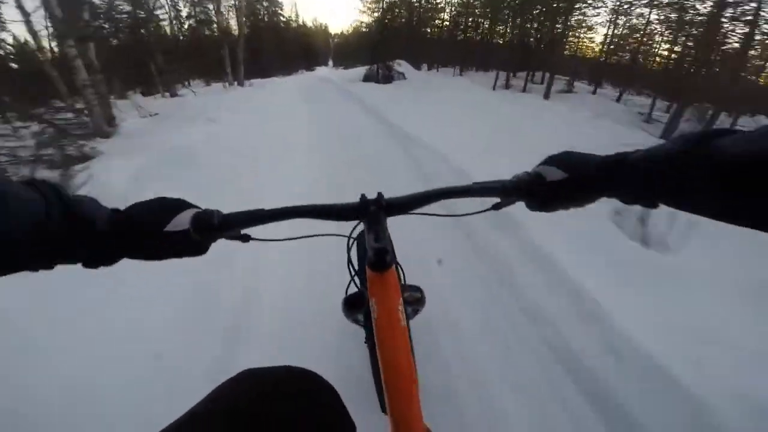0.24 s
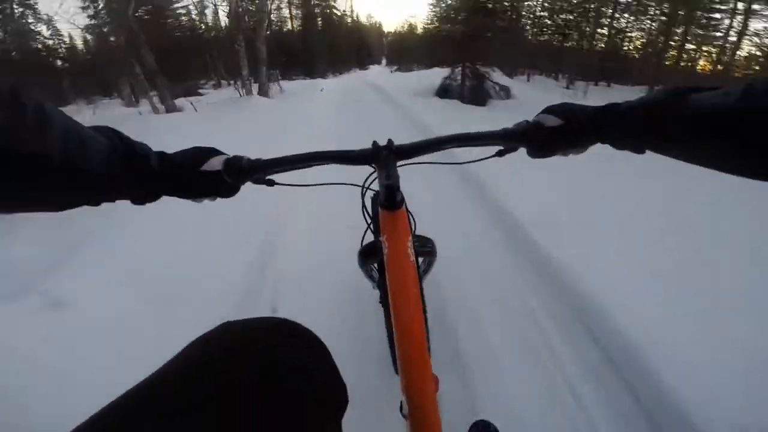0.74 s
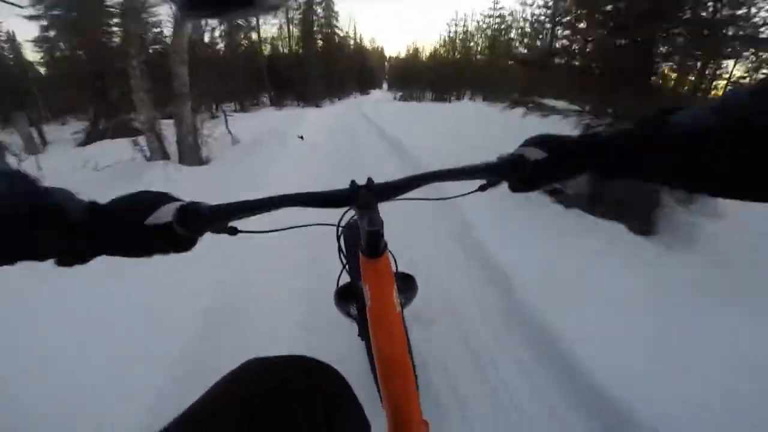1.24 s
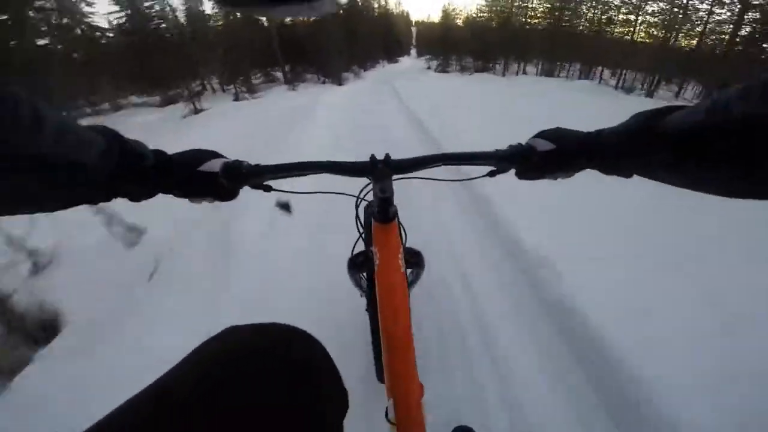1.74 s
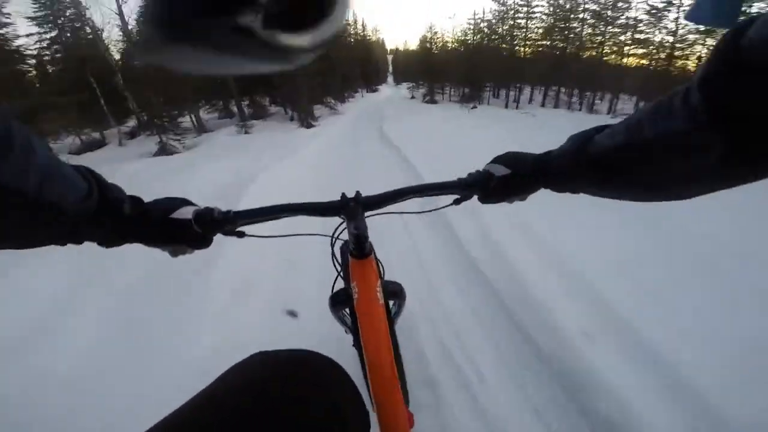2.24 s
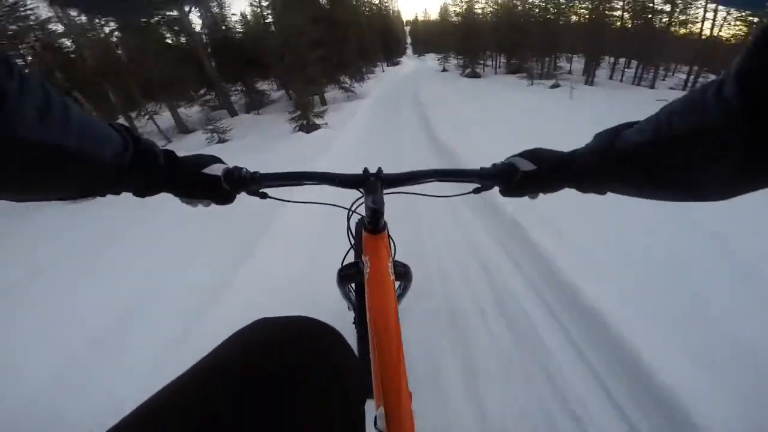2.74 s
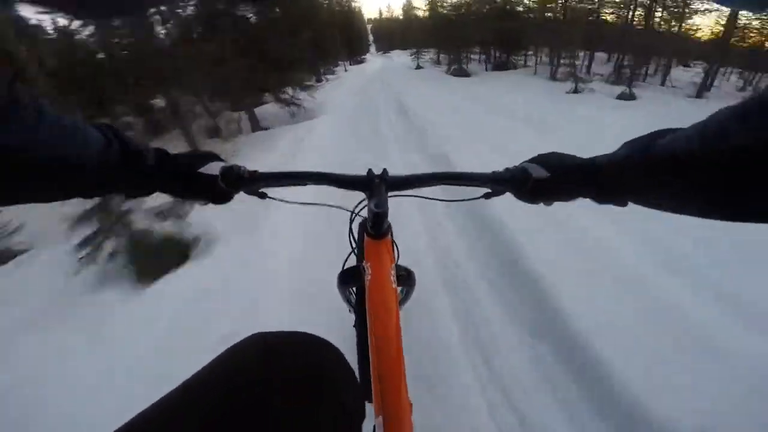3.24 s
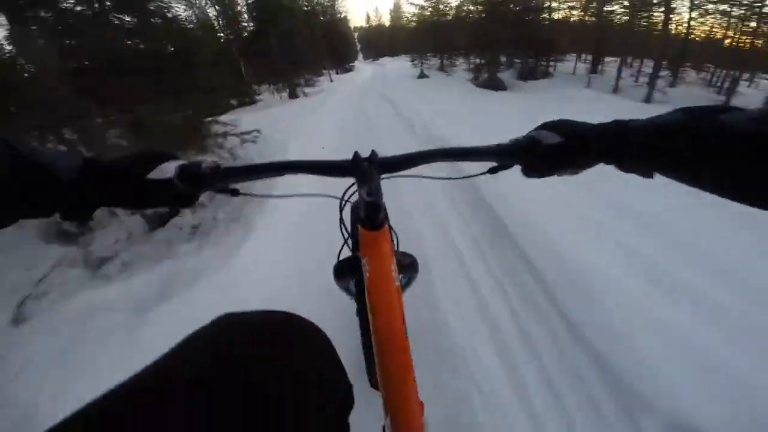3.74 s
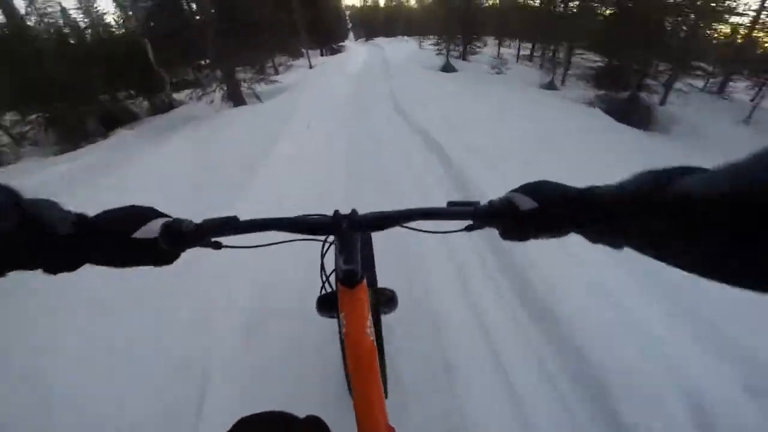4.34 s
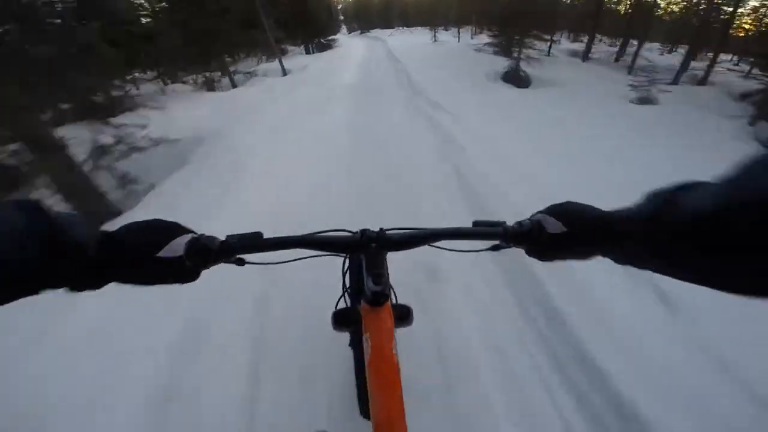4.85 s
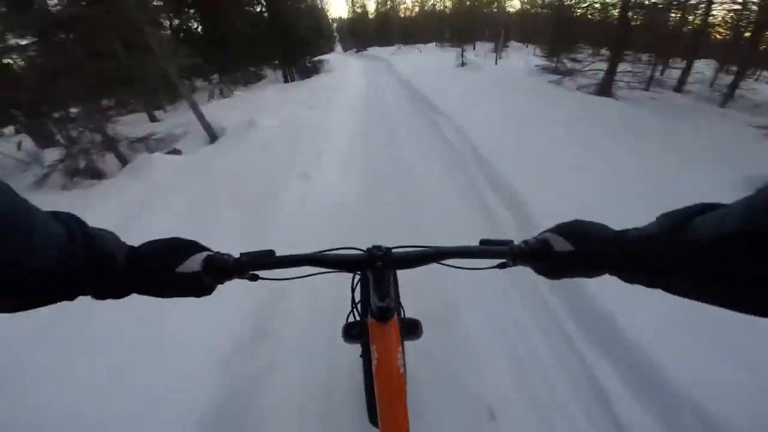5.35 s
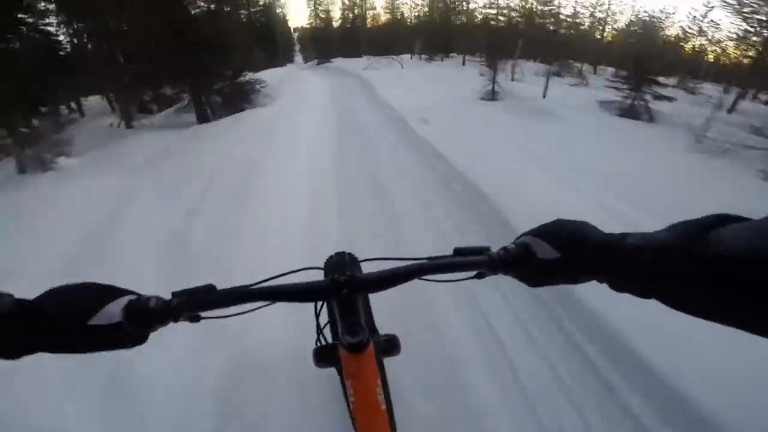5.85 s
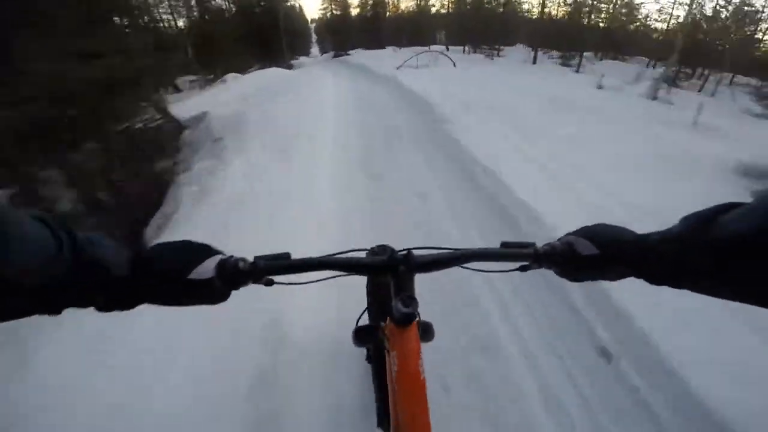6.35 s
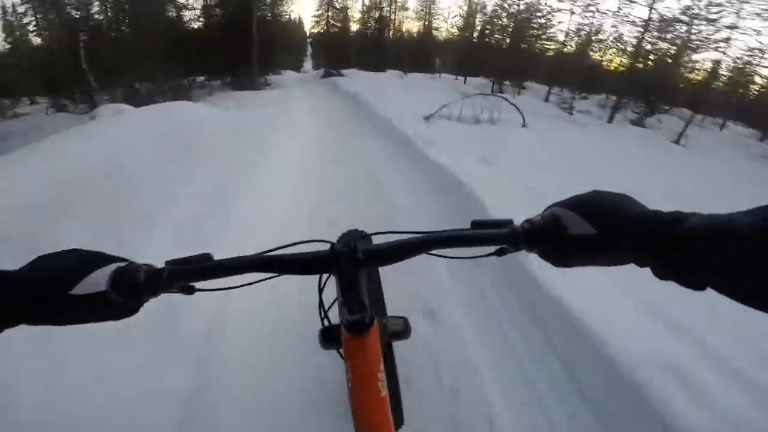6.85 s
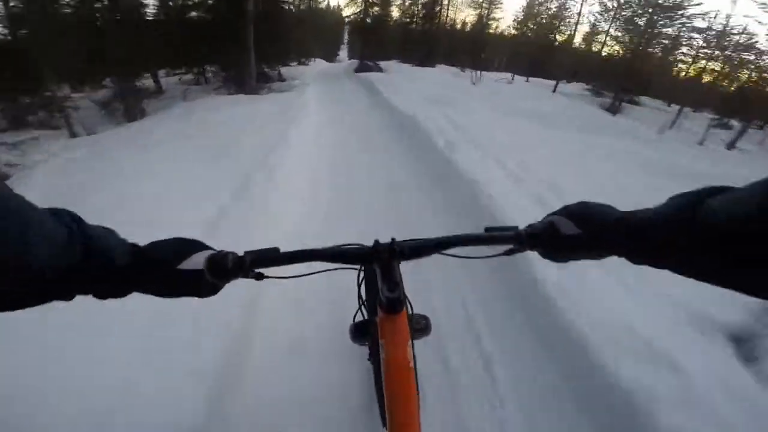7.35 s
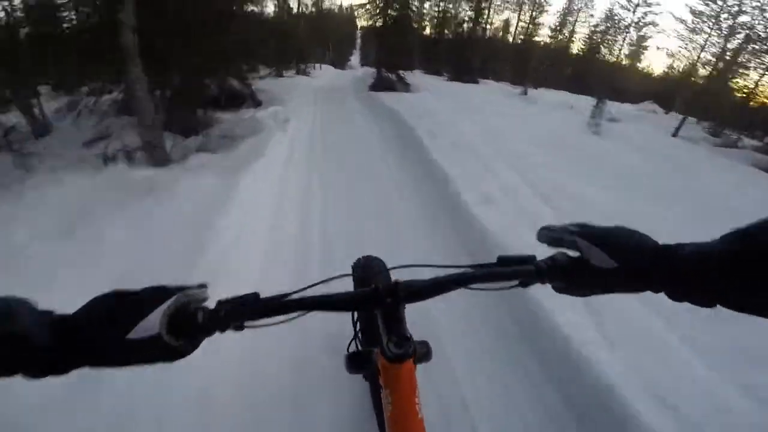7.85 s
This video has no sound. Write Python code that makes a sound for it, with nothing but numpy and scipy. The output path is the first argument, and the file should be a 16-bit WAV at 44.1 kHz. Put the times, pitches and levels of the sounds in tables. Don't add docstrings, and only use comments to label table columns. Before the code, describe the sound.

Outdoors on a snowy forest trail, fat bike tyres roll with a constant muffled crunch, low drone and fine fizz, heard close from a chest-worn camera in a closed case. A hard clipped knock near 1.2 seconds and a harder one near 3.7 each make everything drop quieter, then recover. Wind buffets low; the chain ticks more clearly later.

```python
import sys
import numpy as np
from scipy import signal
from scipy.fft import rfft, irfft, next_fast_len
from scipy.io import wavfile
from scipy.ndimage import uniform_filter1d, map_coordinates

SR = 44100
rng = np.random.default_rng(int(sys.argv[2]) if len(sys.argv) > 2 else 0)


def elevation(decibels):
    levels = np.asarray(decibels, float)
    return 10 ** (levels / 20)


def wav_record(signal):
    frames = np.transpose(np.atleast_2d(signal))
    bounded = np.clip(frames, -1, 1)
    quanta = np.round(bounded * 32767).astype(np.int16)
    wavfile.write(sys.argv[1], SR, quanta)


N = 357629


def unit(x):
    return x / np.sqrt(np.mean(x ** 2) + 1e-20)


def wobble(rate_hz):
    knots = rng.standard_normal(int(N * rate_hz / SR) + 4)
    return map_coordinates(knots, [np.arange(N) * rate_hz / SR])


def swells(t, events, half_s):
    return sum(db * np.exp(-((t - s) / half_s) ** 2) for s, db in events)


def filtered(x, response):
    m = next_fast_len(len(x) + 8192)
    return irfft(rfft(x, m) * response(np.fft.rfftfreq(m, 1 / SR)), m)[:len(x)]


def colour(points):
    f, db = np.transpose(points)
    return lambda hz: elevation(np.interp(np.log(hz + 1), np.log(f + 1), db, -120, -120))


def resonant(modes):
    def response(f):
        total = 0
        for k, (hz, width, db) in enumerate(modes):
            total = total + (-1) ** k * elevation(db) * 1j * f * width / (hz * hz - f * f + 1j * f * width)
        return total
    return response


def damped(hz, corner_hz):
    return 1 / (1 + 1j * hz / corner_hz) ** 3


def patchy(patchy_db, grains_hz=0, size_db=0):
    struck = rng.random(N) < grains_hz / SR
    sizes = elevation(size_db * np.minimum(rng.exponential(1, N), 3.5))
    spikes = struck * sizes * rng.uniform(-1.9, 1.7, N)
    z = signal.stft(rng.standard_normal(N) + 3 * spikes, nperseg=512)[2]
    field = uniform_filter1d(rng.standard_normal(z.shape), size=6, axis=0)
    field = uniform_filter1d(field, size=10, axis=1)
    return signal.istft(z * elevation(patchy_db * unit(field)), nperseg=512)[1][:N]


def add(track, s, sound):
    i = round(s * SR)
    track[i:i + len(sound)] += sound[:len(track) - i]


def rings(modes, t, attack_s):
    total = 0
    for hz, db, t60 in modes:
        total = total + elevation(db + rng.normal(0, 1.4) - 60 * t / t60) * np.sin(2 * np.pi * hz * t)
    return total * (1 - np.exp(-t / attack_s))


# pitch_hz, level_db
DRONE_COLOUR = [(88, -13), (150, -2.5), (209, -3.5), (312, -1.5), (482, -1), (835, -7.5), (1100, -12),
                (1430, -42), (2420, -120)]


def drone(rough):
    level_db = 0.16 * rough + 0.71 * wobble(25) + 0.6 * wobble(6.2)
    return unit(elevation(level_db) * filtered(patchy(2.5), colour(DRONE_COLOUR)))


# pitch_hz, width_hz, level_db
CASE_TONES = [(1331, 314, -6.5), (1850, 357, -3), (2339, 373, 3.5), (2950, 440, 2.5), (3460, 600, -7)]


def crunch(rough):
    level_db = 0.6 * rough + 1.1 * wobble(40)
    grains = patchy(0.89, grains_hz=550, size_db=2.0)
    muffled = filtered(grains, lambda f: resonant(CASE_TONES)(f) * damped(f, 3300) ** 2)
    return unit(elevation(level_db) * muffled)


# pitch_hz, level_db
FIZZ_COLOUR = [(2000, -14), (3400, -0.5), (3890, -9), (4270, -4), (4680, -6.5), (5070, -13), (5600, -10),
               (7380, -20.5), (8720, -21.5), (12200, -29.5), (13500, -27.5), (14800, -38)]


def fizz(rough):
    level_db = 0.85 * rough + 0.79 * wobble(30) + 0.43 * wobble(8.4)
    return unit(elevation(level_db) * filtered(patchy(1.7, grains_hz=610, size_db=3), colour(FIZZ_COLOUR)))


# start_s, level_db
TYRE_LOAD = [(0, -44.5), (.38, -47.5), (.52, -45), (1.0, -47.5), (1.88, -44.5), (2.5, -48.5), (2.88, -48),
             (3.0, -45), (3.55, -46), (3.78, -45), (4.0, -42.5), (4.75, -44), (4.95, -39), (5.25, -44.5),
             (5.5, -42), (6.75, -42), (7.0, -47), (8.11, -47.5)]
# start_s, level_db
ICY_CRUST = [
    (.55, 1.5),
    (1.88, 3.5),
    (3.25, 3),
    (4.6, 2.5),
    (4.93, -1),
    (5.99, -1.5),
    (6.1, 3),
    (6.31, 4),
    (7.53, 5),
    (7.69, 5.5),
]


def tyres(rough):
    t = np.arange(N) / SR
    load_db = np.interp(t, *np.transpose(TYRE_LOAD)) + 45
    flare_db = swells(t, ICY_CRUST, half_s=0.039)
    low = elevation(-47.5 + 0.93 * load_db) * drone(rough)
    middle = elevation(-44.5 + load_db) * crunch(rough)
    high = elevation(-54 + load_db + flare_db) * fizz(rough)
    return low + middle + high


# start_s, level_db
WIND_GUSTS = [(.02, 3), (.36, 0.5), (.62, 3.5), (1.25, 5.5), (1.499, 10), (1.76, 8.5), (2.36, 3.5),
              (2.62, 1), (3.05, -1), (3.23, 14), (3.52, 10), (3.88, 5.5), (4.12, 4.5), (4.62, 1),
              (4.88, 5.5), (5.12, 6), (5.6, 6.5), (6.58, 5.5), (7.33, 5), (7.62, 5.5), (7.9, 4), (8.08, 7)]
# pitch_hz, level_db
WIND_COLOUR = [(5.9, -43), (10, 9), (27, 0), (54, -10.5), (103, -11), (200, -32), (260, -45), (440, -120)]


def wind():
    level_db = -39.5 + swells(np.arange(N) / SR, WIND_GUSTS, half_s=0.1)
    buffeting = elevation(2.6 * wobble(9)) * filtered(patchy(0.39), colour(WIND_COLOUR))
    return elevation(level_db) * unit(buffeting)


# pitch_hz, width_hz, level_db
CASE_GIVE = [(291, 960, -14), (816, 310, -9), (2393, 450, 4.5), (3170, 500, 0.5)]
# pitch_hz, width_hz, level_db
BRIGHT_SHELL = [(3970, 800, 4), (5690, 1200, 0), (7180, 710, 3.5), (8400, 2200, -5), (9700, 1400, -4.5),
                (12400, 3200, -15.5)]
STRUCK_WIDTH_HZ = 182


def contact(hz, width_hz, bright_db, t):
    rattle = 0.14 * rng.standard_normal(len(t)) * elevation(-60 * t / 0.008)
    rattle += 0.075 * rng.standard_normal(len(t)) * elevation(-60 * t / 0.011)
    rattle[0] = -1.0
    panel_db = 8 + 15 * np.log10(STRUCK_WIDTH_HZ / width_hz)
    panels = resonant(sorted(CASE_GIVE + [(hz, width_hz, panel_db)]))
    body = filtered(rattle, lambda f: panels(f) * damped(f, 2400))
    brief = rattle * elevation(-60 * t / 0.018)
    shell = filtered(brief, lambda f: resonant(BRIGHT_SHELL)(f) * damped(f, 14000))
    return body / np.abs(body).max() + elevation(bright_db) * shell / np.abs(shell).max()


# start_s, blow_db, panel_pitch_hz, brightness_db, thump_db
CASE_KNOCKS = [
    (1.1485, -22.5, 2950, -11.5, -33),
    (1.1942, 18.5, 1917, -19, -17),
    (2.2386, -16.5, 880, -13, -27),
    (2.7040, -8.5, 2286, -1.5, -9.5),
    (2.705, -4.5, 1364, -11.5, -16),
    (3.111, -29, 490, -28, -41),
    (3.186, -25.5, 1420, -9, -47),
    (3.6536, 21.5, 1904, -5, -20),
]
# start_s, blow_db
MOUNT_CHATTER = [
    (2.247, -32),
    (2.251, -19.5),
    (2.261, -21),
    (2.267, -32),
    (2.274, -32),
    (2.284, -23),
    (2.286, -25),
    (2.2908, -23.5),
]
# pitch_hz, level_db, decay_s
STEEL_CLIP = [(820, -9.5, 0.066), (1060, -12.5, 0.076), (1150, -2, .072), (1310, -6, 0.053), (1876, 0, .22),
              (2770, -29, 0.14), (5460, -24, .09), (8100, -28, .06)]
# pitch_hz, level_db, decay_s
MOUNT_SWING = [(95, 0.5, 0.046), (180, -0.5, 0.02)]


def knocks():
    out, t = np.zeros(N), np.arange(SR // 4) / SR
    chatter = [(s, db, 1590, -23, db - 10.5) for s, db in MOUNT_CHATTER]
    for s, db, hz, bright_db, thump_db in CASE_KNOCKS + chatter:
        ring = elevation(-42.5 + 1.26 * db) * rings(STEEL_CLIP, t, 0.00052)
        blow = elevation(db) * contact(hz, STRUCK_WIDTH_HZ, bright_db, t)
        thump = elevation(thump_db) * rings(MOUNT_SWING, t, 0.00088)
        add(out, s, blow + ring + thump)
        rebound = elevation(db - 5) * contact(1380, 240, bright_db - 10, t)
        add(out, s + 0.00209, rebound)
    return out


# start_s, depth_db, hold_s, release_s
GAIN_DUCKS = [
    (1.205, -12.5, 0.37, 0.59),
    (3.651, -15, 0.41, 0.45),
]


def ducking(t):
    total = 0
    for s, db, hold, release in GAIN_DUCKS:
        times = [s - 0.012, s - 0.009, s + hold, s + hold + release]
        total = total + np.interp(t, times, [0, db, db, 0])
    return total


# start_s, peak_db, low_part_db
CHAIN_TICKS = [(1.0112, -48, 0), (1.3234, -64, 10.5), (1.3807, -41.5, -5), (1.476, -46.5, -4),
               (1.9629, -48, 2), (2.7362, -57, 4), (3.2217, -50, -2), (4.131, -53, -4), (4.5976, -45, 4),
               (5.0634, -30.5, -4), (5.168, -33, -7), (5.9863, -44, -4), (6.0715, -44, 6),
               (6.6189, -42, -3), (6.8957, -39, -1), (7.3108, -32.5, -9), (7.3944, -30.5, -1.5),
               (7.6799, -42, -2), (7.7733, -38, -3), (8.067, -43, 4)]
# pitch_hz, level_db, decay_s
CHAIN_LINK = [(3235, 4.5, 0.031), (4600, -16, .02), (5600, 5.5, 0.02), (6310, 3, 0.017), (8540, -15, 0.023)]


def chain():
    out, t = np.zeros(N), np.arange(SR // 20) / SR
    for s, db, low_db in CHAIN_TICKS:
        bent = t * (1 + 0.0041 * rng.standard_normal())
        low = elevation(low_db) * rings(CHAIN_LINK[:1], bent, 0.00074)
        high = rings(CHAIN_LINK[1:], bent, 0.0013)
        noise = rng.standard_normal(len(t))
        crack = filtered(noise, lambda f: resonant(BRIGHT_SHELL)(f) * damped(f, 10500))
        tick = low + high + 1.9 * elevation(-60 * t / 0.018) * crack
        add(out, s, elevation(db - ducking(s) - 4.5) * tick)
    return out


# start_s, peak_db, pitch_hz
MOUNT_JOLTS = [(0.202, -43, 95), (0.629, -37, 72.7), (0.836, -39, 122), (0.971, -51, 401), (1.58, -48, 116),
               (1.86, -42.5, 72), (1.986, -43.5, 81), (2.139, -37, 320), (3.18, -34, 246),
               (3.516, -53, 83.4), (3.995, -46, 102), (4.14, -48, 100), (4.354, -42, 121),
               (4.447, -45, 116), (5.017, -34.5, 83.4), (5.253, -39.5, 93), (6.596, -56, 101),
               (6.932, -36.5, 80.7), (7.547, -41, 99.6), (7.662, -52, 75.4), (7.862, -38, 122)]


def jolts():
    out, t = np.zeros(N), np.arange(SR // 8) / SR
    for s, db, hz in MOUNT_JOLTS:
        swing = rings([(hz, 0, 7 / hz)], t, 0.35 / hz)
        add(out, s, elevation(db - ducking(s) + 12) * swing)
    return out


# pitch_hz, level_db
CIRCUIT_WHINE = [(8780, -82.5), (11703, -90.5), (14626, -81)]
# pitch_hz, level_db
CIRCUIT_HISS = [(5000, -33), (8000, -6), (11500, -7), (12400, -10.5), (13300, -16), (14700, -11.5),
                (15200, -30)]


def circuit():
    t = np.arange(N) / SR
    whine = sum(elevation(db - 5.5 + 1.5 * wobble(6)) * np.sin(2 * np.pi * hz * t) for hz, db in CIRCUIT_WHINE)
    hiss = unit(filtered(rng.standard_normal(N), colour(CIRCUIT_HISS)))
    return whine + elevation(-74) * hiss


def scene():
    rough = wobble(13)
    return (wind() + tyres(rough) + knocks() + chain() + jolts())[None]


def band_limit(x):
    return signal.sosfilt(signal.butter(12, 16460, fs=SR, output="sos"), x)


def record(dry):
    x = (dry + circuit()) * elevation(ducking(np.arange(N) / SR))
    x = x / (1 + np.abs(x / 0.96) ** 8) ** (1 / 8)
    x = filtered(x[0], lambda hz: 1 / np.sqrt(1 + (hz / 15500) ** 24))[None]
    return band_limit(x)


dry = scene()
out = record(dry)
wav_record(out)
```